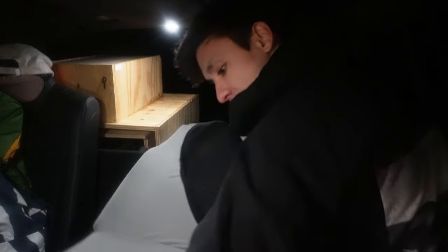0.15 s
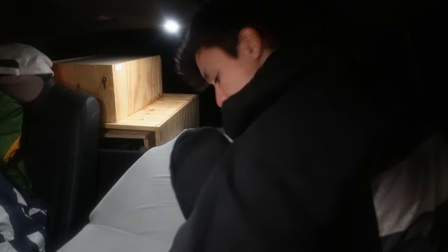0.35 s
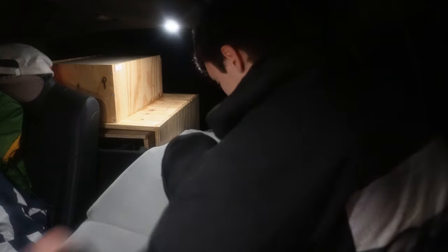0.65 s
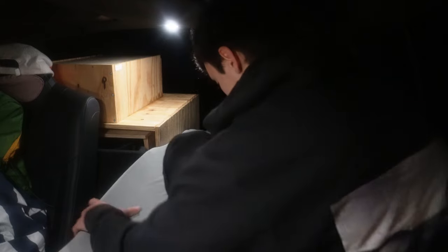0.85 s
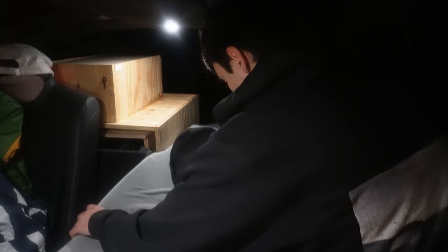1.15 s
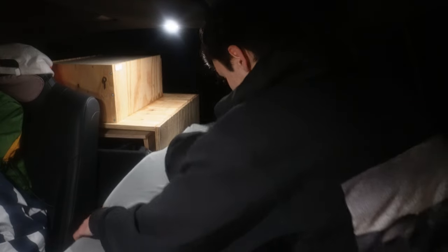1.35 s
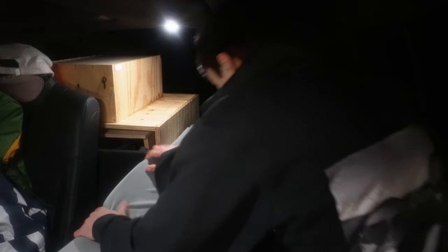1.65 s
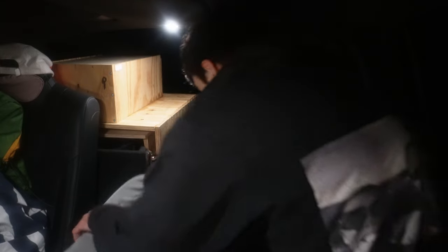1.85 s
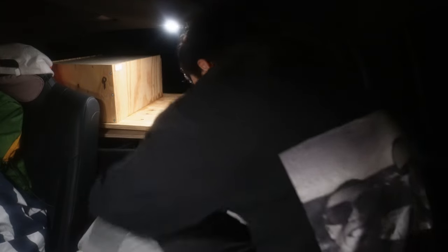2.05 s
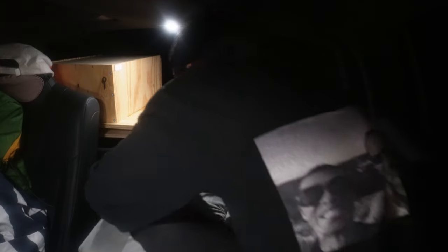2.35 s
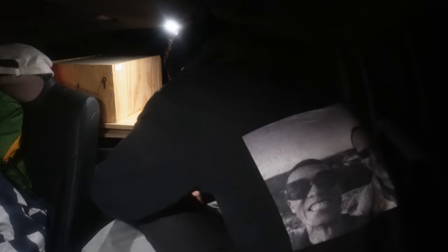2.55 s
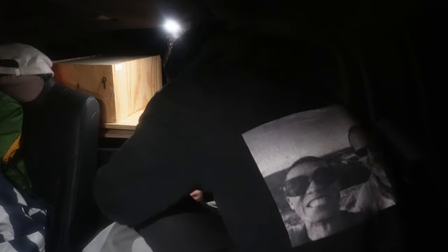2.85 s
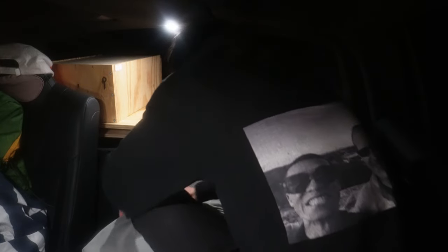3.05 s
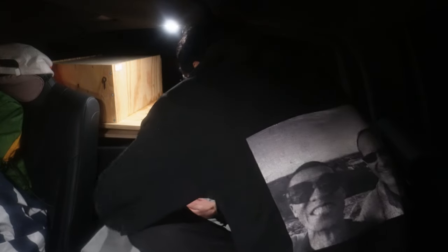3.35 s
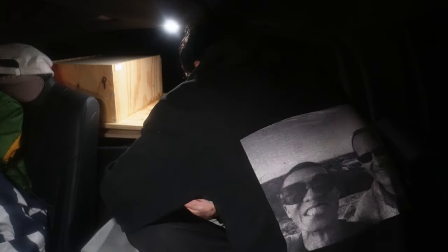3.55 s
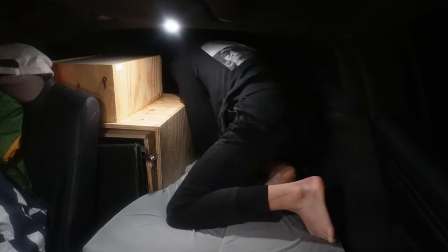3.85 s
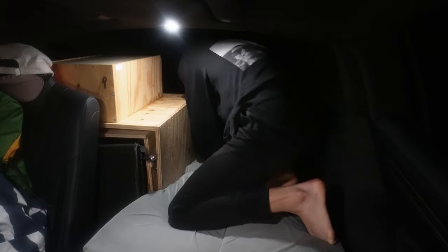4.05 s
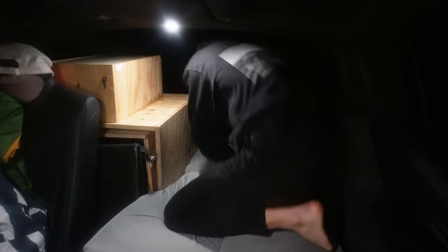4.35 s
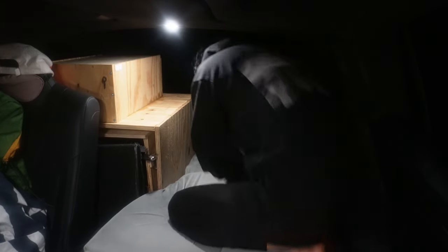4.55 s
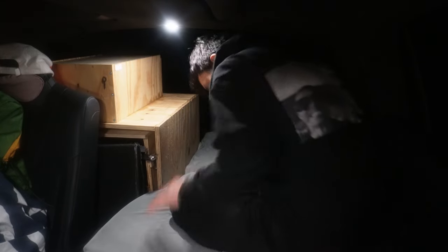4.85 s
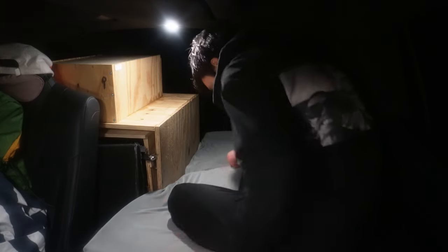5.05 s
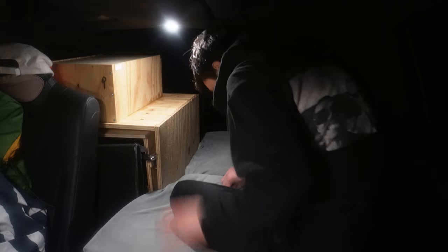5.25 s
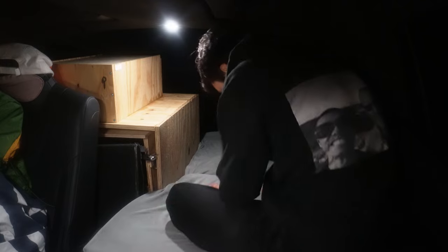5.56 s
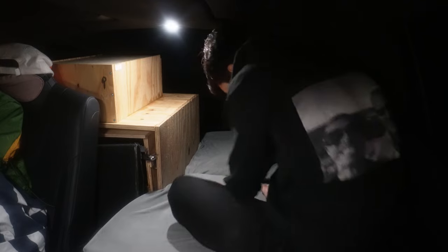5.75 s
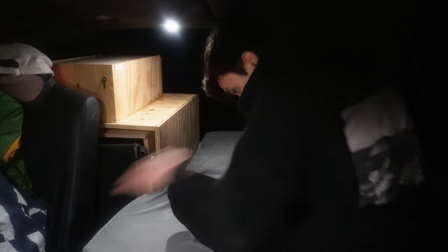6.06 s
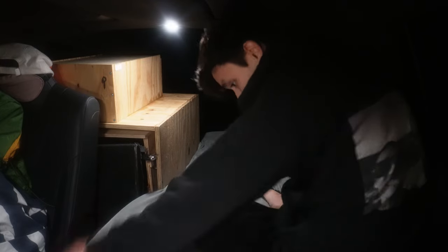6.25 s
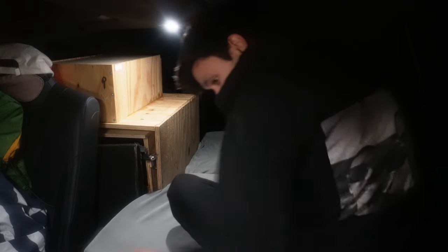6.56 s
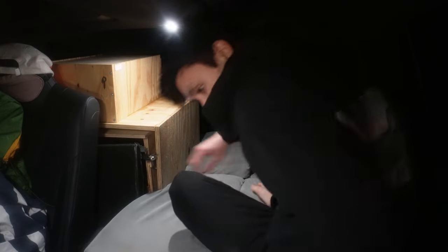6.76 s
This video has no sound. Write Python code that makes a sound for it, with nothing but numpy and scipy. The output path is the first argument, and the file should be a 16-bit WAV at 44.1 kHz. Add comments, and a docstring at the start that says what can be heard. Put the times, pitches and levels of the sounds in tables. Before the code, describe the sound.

Someone shifts foam pads inside a small padded car cabin: quiet cloth friction, muffled knee and hand thumps, a brief scrape, faint steady hiss.

```python
"""Cloth hisses and drags over foam as pads and bedding are laid out in a parked car: shaped friction noise.
Knees and hands thump a wooden platform, trim panels tap and the car body booms: damped modes are struck.
Seams scuff in short noise bands, foam squeaks in gliding tones, ribbed cloth sings in narrow noise.
The small padded cabin answers the knocks and rubs briefly; a steady hiss lies under the nearly mono sound."""
import sys
import numpy as np
from scipy import signal
from scipy.fft import rfft, irfft, next_fast_len
from scipy.io import wavfile
from scipy.ndimage import uniform_filter1d, map_coordinates

SR = 44100
rng = np.random.default_rng(int(sys.argv[2]) if len(sys.argv) > 2 else 0)


def wav_record(signal):
    """Record a signal, one row per channel, as 16-bit PCM in the file named by sys.argv[1]."""
    frames = np.transpose(np.atleast_2d(signal))
    bounded = np.clip(frames, -1, 1)
    # unit amplitude maps onto the largest positive 16-bit level
    quanta = np.round(bounded * 32767).astype(np.int16)
    wavfile.write(sys.argv[1], SR, quanta)


N = 304279

# strokes of cloth over cloth and foam:
# (peak time [s], rise [s], fall [s], hiss level [dB], drag level [dB])
STROKES = [(.005, .05, 0.13, -60.5, -57), (.27, 0.21, 0.11, -59.5, -66.5), (.525, 0.078, 0.041, -75, -61),
           (.75, 0.36, 0.093, -61.5, -62), (.94, 0.13, 0.22, -57.5, -60.5), (1.14, .2, 0.11, -59, -69),
           (1.39, 0.12, 0.34, -62, -67), (1.9, 0.14, 0.15, -62.5, -66.5), (2.2, 0.24, 0.038, -64.5, -67),
           (2.255, 0.027, 0.017, -65, -58), (2.53, 0.19, 0.18, -61, -65), (2.925, .012, 0.046, -64, -59),
           (2.975, 0.049, 0.052, -57.5, -60), (3.06, 0.061, .1, -66, -78), (3.13, 0.017, 0.091, -71, -61.5),
           (3.35, .14, 0.047, -63.5, -67.5), (3.407, 0.016, 0.013, -51.5, -56),
           (3.59, 0.029, 0.049, -71, -85), (3.682, 0.0054, .03, -68, -62), (3.71, 0.024, 0.15, -71, -58.5),
           (3.87, 0.13, .12, -82, -59.5), (3.94, 0.049, 0.019, -57.5, -68), (4.05, 0.13, 0.17, -67, -65),
           (4.2, 0.083, .1, -60.5, -57), (4.275, 0.043, 0.028, -49.5, -42.5), (4.58, 0.25, .15, -57, -78),
           (4.68, 0.17, 0.075, -57, -48), (4.79, 0.09, 0.15, -61, -74), (4.93, 0.14, 0.081, -58.5, -60),
           (5.1, 0.065, 0.16, -57.5, -54.5), (5.187, 0.018, 0.063, -52.5, -48.5),
           (5.235, .04, .04, -58, -55), (5.3, .1, 0.053, -57.5, -57), (5.43, 0.042, 0.043, -54.5, -58),
           (5.63, 0.3, 0.13, -59.5, -60.5), (5.73, 0.048, 0.072, -57.5, -53), (5.91, 0.23, 0.16, -63, -63),
           (6.03, 0.025, .02, -58.5, -59), (6.12, 0.054, 0.1, -67.5, -57.5),
           (6.4, 0.66, 0.29, -70.5, -67.5), (6.81, 0.14, .2, -66.5, -70), (6.895, 0.021, .05, -53, -79)]
# moves of hands and body on the pads:
# (peak time [s], rise [s], fall [s], murmur level [dB], weight level [dB])
MOVES = [(.06, .2, 0.098, -55.5, -54), (.25, 0.048, 0.098, -57, -59.5), (.524, .02, 0.036, -50.5, -55),
         (.863, 0.018, 0.13, -50.5, -68), (1.07, 0.23, 0.39, -60.5, -64), (1.12, 0.038, 0.055, -55, -49),
         (1.265, 0.061, 0.069, -56, -59), (1.32, .03, 0.044, -67, -56), (1.44, 0.089, 0.042, -55.5, -55),
         (1.976, 0.064, 0.31, -58, -67), (2.21, 0.19, 0.08, -54.5, -55.5), (2.53, 0.15, 0.15, -60.5, -57),
         (2.84, 0.04, 0.095, -59, -61), (2.925, 0.014, 0.11, -51.5, -57.5), (3.13, 0.011, .05, -50.5, -56),
         (3.175, .04, .05, -52.5, -59), (3.35, 0.11, 0.082, -57.5, -60.5), (3.69, 0.017, .12, -51.5, -45.5),
         (3.896, 0.016, 0.12, -57.5, -54), (4.18, 0.035, .15, -52.5, -71), (4.32, 0.092, 0.089, -56, -62),
         (4.413, 0.028, 0.012, -65, -38.5), (4.47, 0.055, 0.085, -61, -54),
         (4.6, 0.051, 0.097, -52.5, -46.5), (4.72, 0.086, 0.069, -56, -45.5),
         (4.82, 0.056, 0.068, -67, -60), (4.94, 0.088, 0.064, -58, -48.5), (5.31, 0.058, 0.045, -52, -46.5),
         (5.5, 0.03, 0.44, -58.5, -61.5), (5.732, 0.024, 0.06, -52.5, -58), (6.02, 0.028, 0.11, -56, -63),
         (6.12, 0.013, 0.042, -50, -46), (6.895, 0.059, .1, -52, -47.5)]
FADE_DB, ROUNDNESS = 11.5, 1.12  # loss after one rise or fall time; 1 = pointed peak, 2 = round
REST_HISS_DB, REST_DRAG_DB = -75, -74  # between strokes
# murmur between moves: (time [s], level [dB])
RESTLESS_MURMUR = [(0, -73), (.6, -61), (1.5, -63), (1.8, -65.5), (2.8, -75), (3.5, -76.5), (3.85, -60.5),
                   (5.1, -65.5), (6.2, -70.5), (6.6, -64), (6.9, -70)]
# weight noise between moves: (time [s], level [dB])
RESTLESS_WEIGHT = [(0, -59), (.65, -61), (1, -63.5), (1.7, -63), (2.8, -65.5), (3.55, -68.5), (4.1, -63.5),
                   (5.1, -62), (5.8, -61), (6, -64), (6.9, -60)]
# a pad scraping the platform's edge: (time [s], level [dB])
SCRAPING = [(4.14, -67), (4.152, -48.5), (4.2, -41), (4.275, -40.5), (4.325, -62)]
# relative spectrum of cloth hissing: (frequency [Hz], density [dB per Hz])
HISS_SPECTRUM = [(1470, -18), (2500, -6), (3620, -2.5), (4560, -3), (8460, -1), (13400, -6), (15100, -2.5),
                 (15800, -35.5)]
# cloth dragging over foam: (frequency [Hz], density [dB per Hz])
DRAG_SPECTRUM = [(530, -9.5), (900, -11), (1230, -6.5), (1410, -6), (2160, -4.5), (2480, -6), (2750, -8),
                 (4440, -12), (7000, -16.5), (9100, -37), (15400, -120)]
# the scraping pad: (frequency [Hz], density [dB per Hz])
SCRAPE_SPECTRUM = [(260, -40), (450, -21), (541, 0), (763, -1), (1030, 4), (1560, 3.5), (2120, -4),
                   (2270, 2), (2790, -2.5), (4220, -10), (7000, -28), (9100, -54), (15400, -120)]
# the murmur of moves: (frequency [Hz], density [dB per Hz])
MURMUR_SPECTRUM = [(190, -30.5), (330, -2), (572, -6), (690, -3), (746, -7.5), (934, -9), (1200, -18),
                   (1400, -17), (1820, -42), (3080, -120)]
# the low noise of shifting weight: (frequency [Hz], density [dB per Hz])
WEIGHT_SPECTRUM = [(13, -45), (22, -10.5), (75, -0.5), (117, 2), (146, 2.5), (340, -4.5), (370, -2.5),
                   (481, -4), (600, -11), (780, -44), (1320, -120)]
# thumps on the platform; the slap is relative to the ring, before a common trim:
# (time [s], ring peak [dB], favoured pitch [Hz], slap [dB], damping [factor])
THUMPS = [(.035, -44, 200, -18, 1.1), (.049, -47, 300, -18, 1.3), (.106, -46, 330, -18, 1.3),
          (1.116, -39, 99, -16, 1.1), (1.146, -39, 126, -12, 2.9), (1.2345, -24, 249, -27, 3.1),
          (1.2425, -28.5, 326, -34, 1.4), (1.259, -20, 355, -24.5, 1), (1.268, -22.5, 335, -24, 1.3),
          (1.979, -28.5, 430, -34, 1.7), (3.256, -44, 150, -29, 1.4), (3.349, -43.5, 430, -25, 1.1),
          (3.366, -39, 410, -17, 3.7), (3.687, -26, 200, -4.5, 1.5), (3.708, -27, 243, -22, 2.5),
          (3.749, -25.5, 252, -19.5, 2.9), (3.915, -43, 413, -16, 1.7), (3.8, -44, 200, -18, 1.5),
          (3.926, -42, 200, -9, 1.3), (4.318, -42.5, 185, -10, 1.3), (4.339, -36, 353, -10, 1.2),
          (4.36, -31, 250, -11.5, 1.4), (4.382, -24, 240, -18, 2.1), (4.406, -20.5, 234, -22, 2.2),
          (4.511, -44.5, 225, -17, 2.1), (4.592, -13.5, 206, -21, 1.45), (4.667, -20, 190, -13.5, 0.94),
          (4.702, -26, 175, -18, 1.5), (4.725, -31.5, 200, -24, 1.6), (4.897, -35.5, 140, -6.5, 0.48),
          (4.922, -38.5, 100, -16, 0.87), (5.053, -46, 193, -21, 1), (5.262, -31, 366, -5, 0.72),
          (5.292, -27.5, 388, 1, 0.41), (5.654, -35, 318, -34, 1.2), (5.726, -37.5, 404, -6, 1.2),
          (6.000, -39.5, 222, -5, 0.4), (6.027, -35, 383, 4, 1.1), (6.1065, -9.5, 202, -20.5, 1.06),
          (6.1095, -13.5, 370, -46, 2.5), (6.876, -37.5, 400, -15, 2.1)]
# modes of the wooden platform: (frequency [Hz], level [dB], t60 at damping 1 [s])
PLATFORM_MODES = [(104, -8.5, 0.22), (159.4, 4, 0.042), (205.3, 5.5, 0.048), (261, -1, 0.049),
                  (368.5, 4.5, 0.041), (449, 7, 0.012), (714, 17, 0.01), (1034, -36, 0.029)]
# taps of trim panels, slap as for the thumps:
# (time [s], ring peak [dB], favoured pitch [Hz], slap [dB], damping [factor])
TAPS = [(.467, -48, 640, -17, 1.1), (.4995, -16.5, 600, -32, 0.47), (.506, -19, 570, -9, 2.1),
        (.525, -52, 690, -21, .9), (.86, -40.5, 550, -24, 0.53), (1.166, -41.5, 720, -19, 0.34),
        (1.89, -44, 740, -17, .74), (1.931, -36.5, 740, -27, .63), (1.984, -35, 690, -28, .31),
        (2.057, -33.5, 766, -32, 0.29), (2.134, -45, 890, -16, 1.1), (2.182, -40, 830, -18, 1.1),
        (2.253, -38.5, 640, -21, 0.6), (2.467, -44, 437, -11, 1.1), (2.718, -47.5, 627, -23, 0.88),
        (2.764, -46, 725, -21, 1.1), (2.914, -46, 567, -1, 0.57), (3.119, -22.5, 850, -26, 0.91),
        (3.16, -36.5, 865, -2, 0.52), (3.198, -45, 760, -21, 0.84), (3.409, -41, 840, 3, 0.94),
        (3.622, -27.5, 740, -24, .85), (3.688, -30, 487, -10, 0.66), (4.59, -18.5, 785, -27, 1.3),
        (5.293, -24.5, 525, -21, 0.34), (6.026, -39, 490, 2, 0.68), (6.588, -39, 720, -20, 0.88),
        (6.597, -33.5, 794, -22, .84), (6.637, -51, 712, 0.5, .9)]
# modes of the trim panels: (frequency [Hz], level [dB], t60 at damping 1 [s])
TRIM_MODES = [(402, 9.5, 0.04), (486, 3.5, 0.028), (590, 9.5, 0.014), (739, 4, 0.029), (861, 0.5, 0.024),
              (1386, -15.5, 0.12), (1860, 4, 0.03), (2570, 11.5, .035)]
# weight landing hard enough to rock the car: (time [s], peak level [dB])
ROCKS = [(0.502, -30.5), (.86, -44), (1.117, -41), (1.146, -36), (1.2344, -29), (1.258, -23.5),
         (1.267, -26), (1.984, -37), (3.348, -47), (3.688, -39), (3.749, -38), (3.922, -37.5),
         (4.3835, -47), (4.4088, -40), (4.594, -40), (4.725, -53), (4.897, -31), (4.922, -44), (5.292, -51),
         (6.1065, -50), (6.593, -47), (6.878, -49)]
# modes of the car body: (frequency [Hz], level [dB], t60 [s])
BODY_MODES = [(64.2, -4, 0.059), (78.4, 0, 0.06), (99.5, 3, 0.028), (125.4, -3.5, 0.079)]
# scuffs of seams, level before a common trim, length before its limits:
# (time [s], level [dB], centre [Hz], length [s], half width to 1/e [octaves])
SCUFFS = [(0.504, -35.5, 3970, 0.016, 1.27), (1.704, -47, 2850, 0.009, 1.1),
          (2.197, -37.5, 3980, 0.0087, 1.2), (2.235, -42.5, 2720, 0.024, 1.7),
          (2.719, -49, 2570, 0.0042, 0.46), (3.041, -46, 2600, 0.011, 1.4), (3.159, -40, 4500, 0.0044, 1.5),
          (3.396, -44.5, 3000, 0.036, 1.7), (4.034, -42, 2250, 0.0069, 0.73),
          (4.063, -41, 1940, .011, 0.62), (4.092, -44, 2940, 0.0088, 0.99),
          (4.381, -37.5, 7150, 0.0036, 0.68), (4.909, -38.5, 3000, 0.0049, 0.88),
          (5.176, -39, 5500, 0.018, 1.2), (5.261, -35, 2300, .008, 2.1), (5.29, -24.5, 2520, 0.016, 1.32),
          (6, -48, 1600, 0.011, 1.7), (6.026, -25.5, 2600, 0.0087, 0.71)]
# squeaks of foam skin: (start [s], end [s], from [Hz], to [Hz], peak level [dB])
SQUEAKS = [(3.738, 3.8, 2420, 2130, -56), (3.85, 3.9, 1800, 1700, -60), (3.953, 3.992, 2960, 2870, -61),
           (2.238, 2.27, 2250, 2330, -59)]
# ribbed cloth singing as it rubs: (start [s], end [s], centre [Hz], width [Hz], level [dB])
WEAVE = [(4.55, 4.73, 4550, 250, -56), (4.55, 4.72, 6500, 440, -63), (4.6, 4.73, 1430, 280, -53),
         (3.7, 3.96, 5300, 220, -75), (3.82, 3.99, 1600, 390, -63.5), (1.93, 2.15, 910, 180, -55),
         (2.0, 2.12, 2470, 210, -68), (0.86, 1.24, 1170, 1000, -61.5), (5.5, 5.6, 630, 52, -61.5),
         (6.11, 6.2, 1840, 460, -64)]
# decay of the cabin's answer: (frequency [Hz], t60 [s])
CABIN_DECAY = [(100, 0.087), (400, 0.025), (2000, 0.12), (10000, 0.18)]
# relative spectrum of the steady noise: (frequency [Hz], density [dB per Hz])
STEADY_SPECTRUM = [(13, -34), (22, -8), (82, -17), (248, -25.5), (467, -36.5), (1400, -40), (5550, -35.5),
                   (6550, -37), (8870, -32.5), (15800, -32)]
COMMON_HISS_DB, SIDE_NOISE_DB = -72.5, -90  # steady hiss common to both channels; much fainter noise in the side
# slight bass difference between left and right: (frequency [Hz], level [dB])
APART = [(30, -43), (150, -48), (400, -63), (1000, -71)]
TOP_HZ = 15800  # band limit


def bedding():
    """Superposition of frictions: five noises follow the strokes, the scraping and the moves."""
    hiss, drag = np.hypot(swells(STROKES), amp([[REST_HISS_DB], [REST_DRAG_DB]]))
    murmur, weight = np.hypot(swells(MOVES), [gain(RESTLESS_MURMUR), gain(RESTLESS_WEIGHT)])
    return (hiss * friction(HISS_SPECTRUM, patchy_db=1.15, streaky_db=2.0, flutter_db=0.27, rate=80, spiky_db=1.5)
            + drag * friction(DRAG_SPECTRUM, patchy_db=0.4, streaky_db=2.5, flutter_db=0.9, rate=66, spiky_db=0.3)
            + gain(SCRAPING) * friction(SCRAPE_SPECTRUM, patchy_db=2.0, streaky_db=1.5, flutter_db=0.5,
                                        rate=90, spiky_db=1.5)
            + murmur * friction(MURMUR_SPECTRUM, patchy_db=3.3, streaky_db=0.35, flutter_db=2.5,
                                rate=45, spiky_db=1.5)
            + weight * friction(WEIGHT_SPECTRUM, patchy_db=1.36, streaky_db=0.4, flutter_db=2.33,
                                rate=25, spiky_db=0.2))


def friction(spectrum, patchy_db, streaky_db, flutter_db, rate, spiky_db):
    """Stick-slip of fibres: uneven grains in patches and streaks, fluttering at rate knots a second, rms 1."""
    unevenness = uniform_filter1d(rng.standard_normal(N), size=16) * 4  # rms 1
    grains = rng.standard_normal(N) * amp(spiky_db * unevenness)
    cells = signal.stft(grains, nperseg=512)[2]
    field_db = patchy_db * patches(cells.shape, 6, 8) + streaky_db * patches(cells.shape, 2, 9)
    patchy = signal.istft(cells * amp(field_db), nperseg=512)[1][:N]
    knots = rng.standard_normal(1000)
    flutter = map_coordinates(knots, [np.arange(N) * rate / SR])
    coloured = filtered(patchy, lambda hz: amp(along(spectrum, hz)))
    return unit(amp(flutter_db * flutter) * coloured)


def patches(shape, tall, long):
    """Local correlation: a random field of rms 1, smoothed over so many frequency and time cells."""
    smooth = uniform_filter1d(rng.standard_normal(shape), size=tall, axis=0)
    return unit(uniform_filter1d(smooth, size=long, axis=1))


def swells(rows):
    """Addition of powers: every gesture swells to its peak and fades, giving a gain for each level column."""
    t = np.arange(0, N + SR // 10, SR // 1000) / SR  # about 1 ms apart
    power = 0
    for peak, rise, fall, *levels_db in rows:
        away = np.abs(t - peak) / np.where(t < peak, rise, fall)
        loss_db = FADE_DB * np.minimum(away, 9) ** ROUNDNESS
        power = power + amp(np.array(levels_db)[:, None] - loss_db) ** 2
    return np.array([np.interp(np.arange(N) / SR, t, np.sqrt(p)) for p in power])


def thumps():
    """Modal excitation of a platform: knees and hands strike the wood with a soft onset."""
    return blows(THUMPS, PLATFORM_MODES, attack=0.0021, focus_db=10.5, slap_hz=1050, slap_t60=0.054)


def taps():
    """Modal excitation of trim panels: a quicker onset, a tighter choice of modes and a brighter slap."""
    return blows(TAPS, TRIM_MODES, attack=0.00059, focus_db=18, slap_hz=3430, slap_t60=0.011)


def blows(events, modes, attack, focus_db, slap_hz, slap_t60):
    """Selective excitation: modes near the favoured pitch ring most (focus in dB per octave), noise slaps."""
    track, t = np.zeros(N), np.arange(SR // 4) / SR
    for s, db, favoured_hz, slap_db, damping in events:
        ring = ringing(modes, lambda hz: -focus_db * np.abs(np.log2(hz / favoured_hz)), damping, attack)
        slap = unit(noise_band(len(t), slap_hz, octaves=1.09))
        slap_gain = np.tanh(t / attack) * amp(slap_db - 4.5 - 60 * t / slap_t60)
        add(track, s, amp(db) * (ring + slap * slap_gain))
    return track


def ringing(modes, extra_db, damping, attack):
    """Modal superposition: a quarter second of decaying struck modes, peak 1."""
    t = np.arange(SR // 4) / SR
    hz, level_db, t60 = np.transpose(modes)[:, :, None]
    chance_db = rng.normal(0, 1.5, hz.shape)  # no two blows alike
    db = level_db + extra_db(hz) + chance_db - 60 * t * damping / t60
    swell = 1 - np.exp(-(t / attack) ** 2)  # foam spreads the push
    ring = np.sum(amp(db) * np.sin(2 * np.pi * hz * t), axis=0) * swell
    ring = filtered(ring, lambda f: 1j * f / (0.87 * hz[0] + 1j * f))  # little radiates below the lowest mode
    return ring / np.max(np.abs(ring))


def booms():
    """Low-frequency resonance: the modes of the car body boom under landing weight."""
    track = np.zeros(N)
    for s, db in ROCKS:
        add(track, s, amp(db) * ringing(BODY_MODES, np.zeros_like, damping=1, attack=0.0022))
    return track


def scuffs():
    """Transient friction: each rub of a seam is a quick swell of noise round a centre pitch."""
    track = np.zeros(N)
    for s, db, hz, length, octaves in SCUFFS:
        t = np.arange(SR // 5) / SR / np.clip(length, .004, .08)  # in lengths
        swell = np.tanh(20.0 * t) * np.exp(-t ** 2 * 2)
        add(track, s, amp(db - 12.5) * unit(noise_band(len(t), hz, octaves)) * swell)
    return track


def squeaks():
    """Periodic stick-slip: foam skin sounds short gliding tones of slightly wandering pitch."""
    track = np.zeros(N)
    for start, end, from_hz, to_hz, db in SQUEAKS:
        n = round((end - start) * SR)
        wander_hz = uniform_filter1d(rng.standard_normal(n), size=100) * 120
        phase = 2 * np.pi * np.cumsum(np.linspace(from_hz, to_hz, n) + wander_hz) / SR
        add(track, start, amp(db) * np.sin(phase) * np.sqrt(np.hanning(n)))
    return track


def weave_song():
    """Resonant filtering: ribbed cloth sings as noise in a narrow band while it rubs."""
    track = np.zeros(N)
    for start, end, hz, width_hz, db in WEAVE:
        n = round((end - start) * SR)
        band = filtered(rng.standard_normal(n), lambda f: 1 / (1 + (2 * (f - hz) / width_hz) ** 2))
        add(track, start, amp(db) * unit(band) * np.sqrt(np.hanning(n)))
    return track


def cabin(x):
    """Reverberation: each frequency decays at its own speed; every 0.3 s meets a new pattern of echoes."""
    wet, step = np.zeros(N), 3 * SR // 10
    for start in range(0, N, step):
        hz, t, cells = signal.stft(rng.standard_normal(SR // 4), SR, nperseg=256)
        decay = amp(-60 * t / along(CABIN_DECAY, hz)[:, None])
        tail = signal.istft(cells * decay, SR, nperseg=256)[1]
        echo = signal.fftconvolve(x[start:start + step], tail / np.linalg.norm(tail))
        add(wet, start / SR + .004, echo)
    return wet


def amp(db):
    """Decibel law: the gain of a level in dB."""
    return 10 ** (np.asarray(db) / 20)


def unit(x):
    """Power normalisation: x at rms 1."""
    return x / np.sqrt(np.mean(x ** 2) + 1e-20)


def along(points, hz):
    """Logarithmic frequency scale: interpolates (Hz, value) points along it."""
    f, v = np.transpose(points)
    return np.interp(np.log(hz + 1), np.log(f + 1), v)


def gain(rows):
    """Level contour: one gain per sample from (s, dB) rows, -120 dB outside them."""
    s, db = np.transpose(rows)
    return amp(np.interp(np.arange(N) / SR, s, db, -120, -120))


def filtered(x, response):
    """Linear filtering: the spectrum of x times a response of frequency."""
    m = next_fast_len(x.shape[-1] + 8192)  # room for the filter's tail
    return irfft(rfft(x, m) * response(np.fft.rfftfreq(m, 1 / SR)), m)[..., :x.shape[-1]]


def noise_band(n, hz, octaves):
    """Band-passed noise: a bell on the octave scale, down to 1/e at so many octaves from its centre."""
    return filtered(rng.standard_normal(n), lambda f: np.exp(-(np.log2((f + 1) / hz) / octaves) ** 2))


def add(track, s, sound):
    """Superposition: mixes a sound into the track at s seconds."""
    part = track[max(round(s * SR), 0):][:len(sound)]
    part += sound[:len(part)]


def scene():
    """Direct and reverberant sound: knocks and rubs excite the cabin, over the dry bedding."""
    knocks = thumps() + taps() + booms() + scuffs() + squeaks() + weave_song()
    knocks = filtered(knocks, lambda hz: (1j * hz / (38 + 1j * hz)) ** 2)  # a small cabin carries no deep bass
    mono = bedding() + knocks + amp(-17) * cabin(knocks)
    return np.array([mono, mono])


def record(dry):
    """Nearly mono mix: steady hiss, with a faint noise and slight bass difference between channels."""
    common, faint = filtered(rng.standard_normal((2, N)), lambda hz: amp(along(STEADY_SPECTRUM, hz)))
    mid = dry[0] + amp(COMMON_HISS_DB) * unit(common)
    bass_difference = filtered(mid, lambda hz: 1j * amp(along(APART, hz)))  # a quarter cycle off the middle
    side = amp(SIDE_NOISE_DB) * unit(faint) + bass_difference
    return filtered(np.array([mid + side, mid - side]), lambda hz: hz < TOP_HZ)


dry = scene()
out = record(dry)
wav_record(out)
```